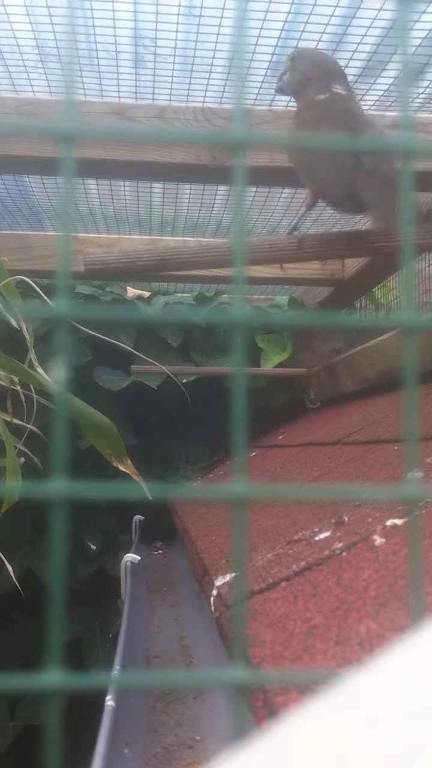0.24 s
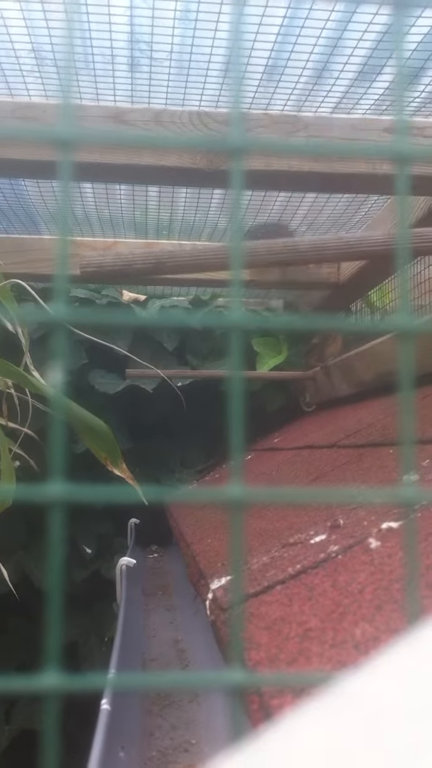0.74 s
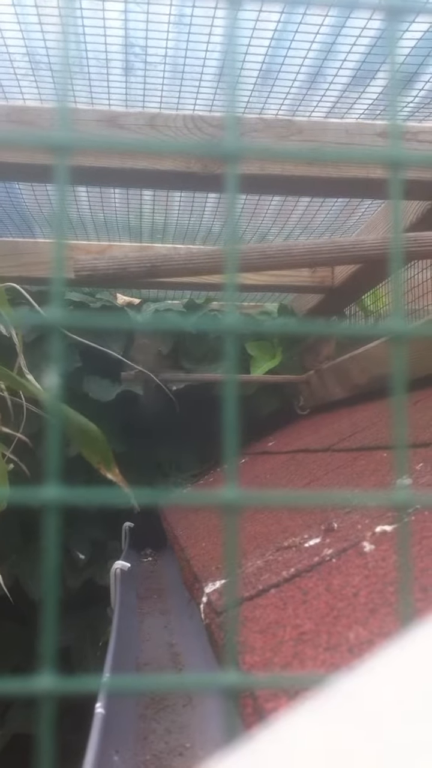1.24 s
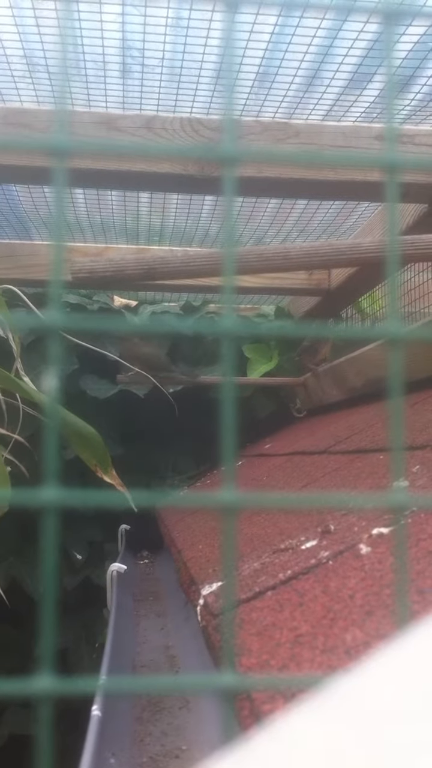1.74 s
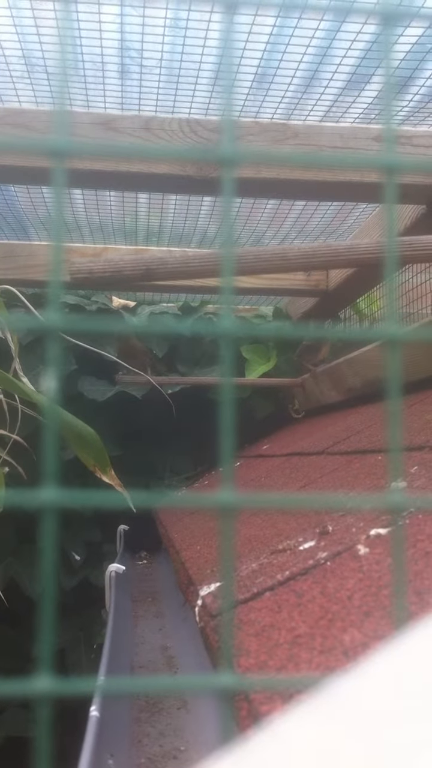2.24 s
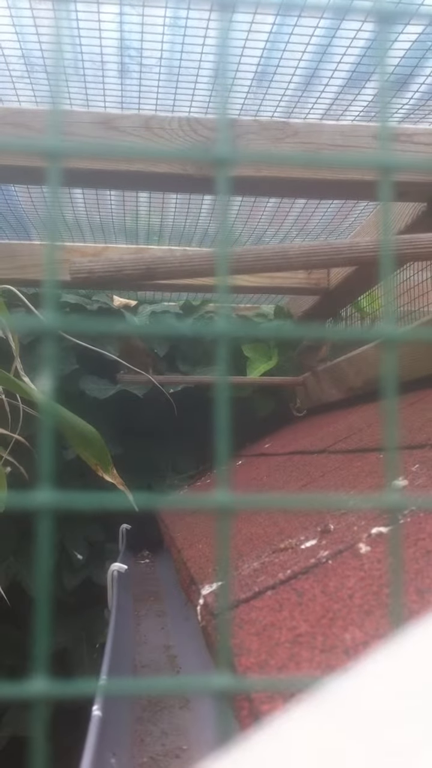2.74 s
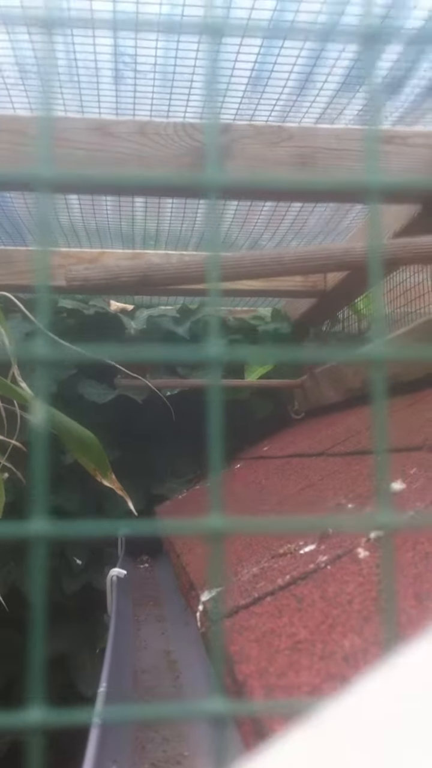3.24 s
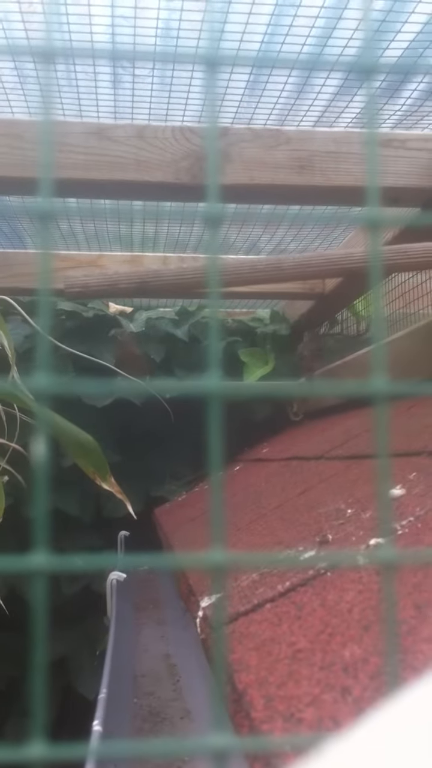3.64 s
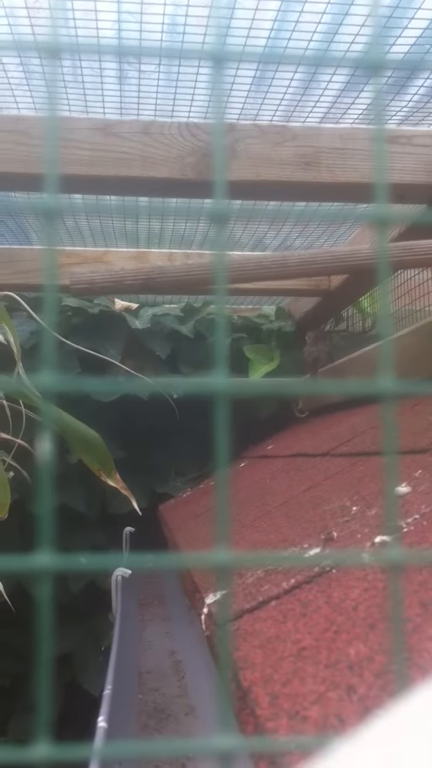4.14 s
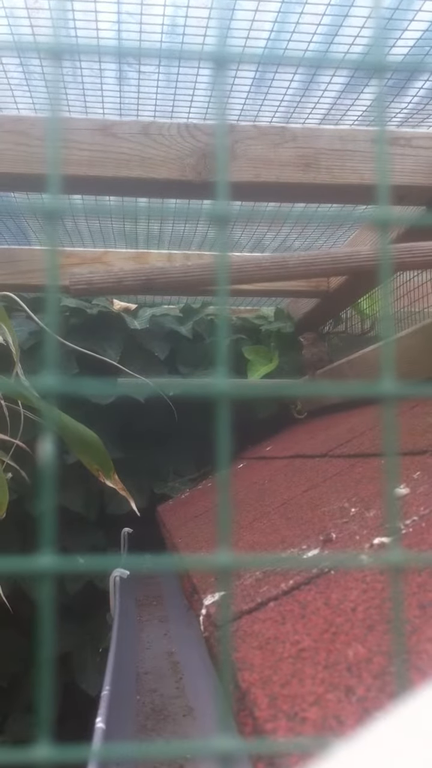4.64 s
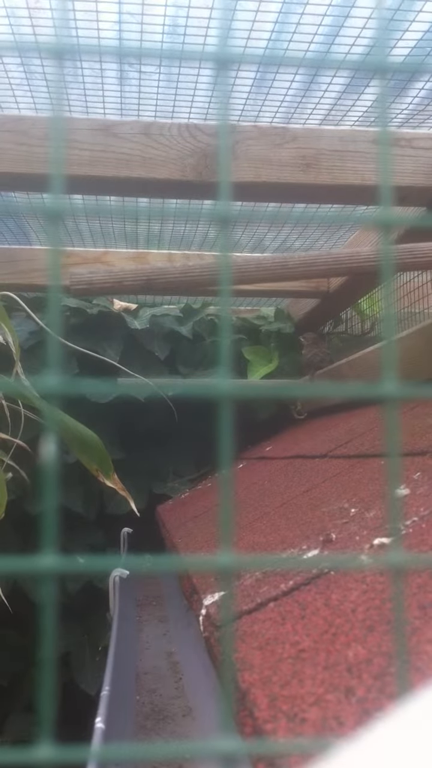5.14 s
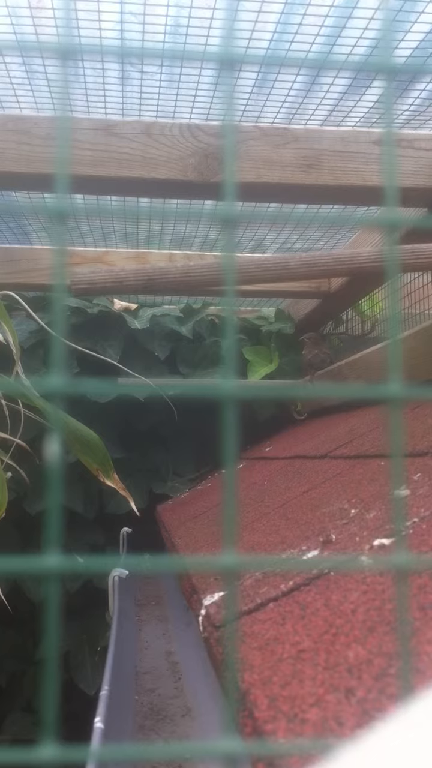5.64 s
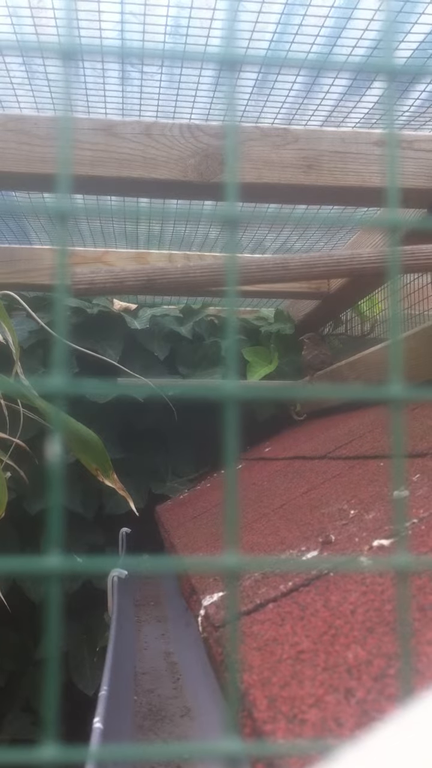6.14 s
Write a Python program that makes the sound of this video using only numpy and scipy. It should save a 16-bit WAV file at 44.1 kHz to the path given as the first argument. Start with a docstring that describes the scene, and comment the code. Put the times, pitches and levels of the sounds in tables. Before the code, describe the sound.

A young finch rasps harshly three times, flutters off its perch, then sings falling whistles and quick high chirps with soft knocks in an aviary.

```python
'''Young finch in a small aviary

It rasps three times, flutters off its perch and sings a string of quick high chirps.
Each side of its syrinx is a whistle that holds one pitch and glides to the next; at times the two overlap.
Flurries of wing beats and knocks come between the notes: shaped noise puffs, short thuds and ticks.
Reflections and a diffuse tail smear every glide, and a faint outdoor hush of filtered noise lies underneath.'''
import sys
import numpy as np
from scipy import signal
from scipy.fft import rfft, irfft, next_fast_len
from scipy.io import wavfile
from scipy.ndimage import uniform_filter1d

SR = 44100
rng = np.random.default_rng(int(sys.argv[2]) if len(sys.argv) > 2 else 0)


def to_wav(s):
    """Save 16-bit WAV."""
    ch = np.atleast_2d(s).T  # columns
    pcm = np.round(np.clip(ch, -1, 1) * 32767)  # PCM
    wavfile.write(sys.argv[1], SR, pcm.astype(np.int16))


N = 281799  # length [samples]


def gain_of(db):
    """Decibels to amplitude."""
    return 10 ** (np.asarray(db) / 20)


def evened(x):
    """Scales to rms 1."""
    return x / np.sqrt(np.mean(x ** 2) + 1e-20)


def read(points, hz):
    """Reads a table on a log-frequency axis."""
    table_hz, value = np.transpose(points)
    return np.interp(np.log(hz + 1), np.log(table_hz + 1), value)


def add(mix, start, sound):
    """Mixes a sound in at its start time in seconds."""
    part = mix[max(round(start * SR), 0):][:len(sound)]
    part += sound[:len(part)]


def coloured(x, spectrum):
    """Causal filter with the given spectrum, so resonances ring after each pulse; rms 1."""
    size = next_fast_len(len(x))
    hz = abs(np.fft.fftfreq(size, 1 / SR))
    log_gain = np.log(gain_of(read(spectrum, hz)))
    # the Hilbert transform supplies the minimum phase
    response = np.exp(signal.hilbert(log_gain).conj())[:size // 2 + 1]
    return evened(irfft(rfft(x, size) * response, size)[:len(x)])


def waver(t, rate_hz):
    """Random motion of rms 1: sines of random phase from a tenth of the given rate up to it."""
    rates = rate_hz * np.geomspace(1 / 10, 1, num=16)
    turns = rates[:, None] * t + rng.random((len(rates), 1))
    return evened(np.sin(2 * np.pi * turns).sum(0))


def swell(t, rise_s, depth_db):
    """Level in dB below the peak: a climb over rise_s, then held."""
    return -depth_db * np.maximum(1 - t / rise_s, 0)


def note(hz, db, jitter, flutter_db, rate_hz, fade=0.002):
    """Pitch, phase and loudness of one note, with the small unsteadiness of a young voice."""
    t = np.arange(len(hz)) / SR
    pitch = hz * (1 + jitter * waver(t, rate_hz))
    phase = 2 * np.pi * np.cumsum(pitch) / SR
    to_nearest_end = np.minimum(t, t[-1] - t)
    gate = np.sin(np.pi / 2 * np.clip(to_nearest_end / fade, 0, 1)) ** 2
    return pitch, phase, gate * gain_of(db + flutter_db * waver(t, rate_hz))


# outdoor hush spectrum, relative: (frequency [Hz], level [dB])
HUSH_SPECTRUM = [(15, -63.5), (25, -34.5), (69, -32.5), (89, -12.5), (156, 0), (389, -4), (433, -7.5),
                 (482, -6.5), (2700, -19), (15500, -25.5)]
HUSH_DB = -63


def hush(drift_db=-0.46):
    """Far outdoor rumble and a thin hiss: coloured noise, drifting slightly in level."""
    level_db = HUSH_DB + drift_db * waver(np.arange(N) / SR, 5)
    return gain_of(level_db) * coloured(rng.standard_normal(N), HUSH_SPECTRUM)


# how long the enclosure's tail rings: (frequency [Hz], t60 [s])
TAIL_DECAY = [(300, 0.54), (2000, 0.3), (4500, 0.23), (8000, 0.26), (15000, 0.066)]
# near reflections, before the leaves dull them: (delay [s], gain [x direct sound])
NEAR_REFLECTIONS = [(.0023, 0.43), (.0051, 0.16), (.0087, .17)]


def aviary(x, wet_db, shade_hz):
    """Direct sound and near reflections, dulled by leaves above shade_hz, then the enclosure's diffuse tail."""
    # noise whose bands die away at their own rates
    hz, t, bins = signal.stft(rng.standard_normal(SR // 2), SR, nperseg=256)
    decay = gain_of(-60 * t / read(TAIL_DECAY, hz)[:, None])
    tail = signal.istft(bins * decay, SR, nperseg=256)[1]
    response = np.zeros(SR)
    for delay, gain in [(0.000026, 1)] + NEAR_REFLECTIONS:
        add(response, delay, np.array([gain]))
    leaves = signal.butter(2, min(shade_hz, SR / 2 - 1), fs=SR)
    response = signal.lfilter(*leaves, response)
    add(response, NEAR_REFLECTIONS[0][0], gain_of(wet_db) * tail / np.linalg.norm(tail))
    return signal.fftconvolve(x, response)[:N]


def draught(s=1.0, rise=0.032, fall=0.0071, level_db=-41, hz=124, second=0.33):
    """The wake of the passing bird buffets the microphone for a few uneven cycles."""
    out, t = np.zeros(N), np.arange(-SR // 10, SR // 10) / SR
    phase = 2 * np.pi * np.cumsum(hz * (1 + .07 * waver(t, 60))) / SR
    bulge = np.exp(-(t / np.where(t < 0, rise, fall)) ** 2 / 2)
    buffeting = evened(np.sin(phase) + second * np.sin(2 * phase))
    add(out, s + t[0], gain_of(level_db) * bulge * buffeting)
    return out


# bumps and claw ticks: (time [s], dull thud level [dB], sharp click level [dB])
BUMPS_AND_TICKS = [(0.508, -56, -61), (.672, -70, -53), (0.794, -43, -46), (2.763, -45.5, -60),
                   (3.182, -60.5, -49.5), (3.349, -32, -51), (5.648, -56, -60.5)]
# perches ringing as the bird pushes off or lands: (time [s], pitch [Hz], level [dB], t60 [s])
PERCH_RINGS = [(0.231, 437, -30, 0.063), (2.093, 546, -44, 0.11)]
# body of a dull thud, relative: (frequency [Hz], level [dB])
THUD_SPECTRUM = [(40, -32.5), (150, 2), (300, -2), (500, -15), (850, -10), (1100, -39.5), (4000, -69.5)]


def knocks(click_t60=0.046, ring_rise=0.008):
    """Dull bumps are a filtered impulse, claw ticks a decaying noise burst, a perch a short ringing sine."""
    out, t = np.zeros(N), np.arange(SR // 5) / SR
    thud = coloured(signal.unit_impulse(len(t)), THUD_SPECTRUM)
    for s, thud_db, click_db in BUMPS_AND_TICKS:
        add(out, s, gain_of(thud_db) * thud / abs(thud).max())
        scratch = coloured(rng.standard_normal(len(t)), FEATHER_SPECTRUM)
        add(out, s, scratch * gain_of(click_db - 60 * t / click_t60))
    for s, hz, db, t60 in PERCH_RINGS:
        ring = gain_of(db - 60 * t / t60) * (1 - np.exp(-t / ring_rise))
        add(out, s, ring * np.sin(2 * np.pi * hz * t))
    return out


# flurries of wing beats: (start [s], beat count, air push level [dB], feather rustle level [dB])
WING_FLURRIES = [(0.651, 2, -58, -66.5), (0.8, 2, -47.5, -52), (1.046, 3, -47.5, -63),
                 (1.222, 2, -54, -71.5), (4.415, 6, -56, -64.5), (4.747, 3, -58.5, -67.5)]
# puff of pushed air, relative: (frequency [Hz], level [dB])
PUSH_SPECTRUM = [(40, -52), (110, -1.5), (220, 4), (550, -5), (1000, -18), (8000, -45)]
# scraping feathers, shared by the claw ticks, relative: (frequency [Hz], level [dB])
FEATHER_SPECTRUM = [(200, -16.5), (900, 2.5), (2500, 4), (5500, 4), (8500, -1.5), (15500, -20.5)]
BEAT_PERIOD_S, BEAT_SPREAD_DB = 0.044, 0.8


def wings(push_time=0.0066, rustle_time=0.016, grain_db=5.5):
    """Each downstroke pushes a puff of air while the feathers scrape over each other."""
    t = np.arange(-SR // 10, SR // 10) / SR
    push, rustle = np.zeros((2, N))
    for start, count, push_db, rustle_db in WING_FLURRIES:
        efforts_db = BEAT_SPREAD_DB * rng.standard_normal(round(count))
        for k, effort_db in enumerate(efforts_db):
            s = start + k * BEAT_PERIOD_S + t[0]
            add(push, s, gain_of(push_db + effort_db) * np.exp(-(t / push_time) ** 2 / 2))
            add(rustle, s, gain_of(rustle_db + effort_db) * np.exp(-(t / rustle_time) ** 2 / 2))
    # quick random level changes make the rustle grainy
    roughness = evened(uniform_filter1d(rng.standard_normal(N), size=60))
    grain = evened(gain_of(grain_db * roughness))
    puffs = push * coloured(rng.standard_normal(N), PUSH_SPECTRUM)
    return puffs + rustle * grain * coloured(rng.standard_normal(N), FEATHER_SPECTRUM)


# soft peeps, single or in a trill: (start [s], count, pitch [Hz], level [dB])
SOFT_PEEPS = [(.886, 1, 2603, -49), (.89, 1, 3280, -54), (1.197, 1, 3270, -60.5), (4.212, 1, 3690, -53),
              (5.627, 5, 3670, -55), (6.125, 1, 3890, -73)]
PEEP_PERIOD_S, PEEP_LENGTH_S = .047, 0.033


def peeps():
    """Short rounded pips at an even pace: a sine under an arched envelope."""
    out, t = np.zeros(N), np.arange(0, PEEP_LENGTH_S, 1 / SR)
    arch = np.sin(np.pi * t / PEEP_LENGTH_S) ** 2
    for s, count, hz, db in SOFT_PEEPS:
        for k in range(round(count)):
            _, phase, loud = note(np.full(len(arch), hz), db, jitter=.006, flutter_db=.8, rate_hz=220)
            add(out, s + k * PEEP_PERIOD_S, np.sqrt(2) * arch * loud * np.sin(phase))
    return out


# nasal rising notes: (start [s], length [s], first pitch [Hz], last pitch [Hz], peak level before the
# common trim [dB], swell time [s], swell depth [dB], hoarseness [0-1], overtone slope [dB per octave])
NASAL_NOTES = [(0.795, .11, 1690, 2668, -46, 0.091, 16, 0.77, 6.5),
               (2.365, 0.014, 1852, 2210, -48.5, .006, 8, 0.73, 4),
               (2.639, .107, 2070, 2422, -40, 0.05, 9, 0.22, 5.5),
               (3.679, .335, 1031, 2096, -44, 0.38, 4.5, 0, -2.5)]
# throat resonance over a nasal note, relative: (frequency [Hz], level [dB])
NASAL_THROAT = [(1000, -18), (2300, 8), (4500, 2), (15000, -21.5)]
# partials 1, 2, 3, .. before slope and throat, relative: (level [dB])
NASAL_PARTIALS = [-6, -1.5, -9, -14, -14.5, -12]
WHINE_LULL = .045  # the climb slackens halfway


def whines(level_db=-1, scatter=0.58, scatter_hz=900, steady_jitter=0.005, hoarse_jitter=0.023):
    """A buzzier membrane gives overtones that climb through the throat; uneven cycles smear the upper ones."""
    out, k = np.zeros(N), np.arange(len(NASAL_PARTIALS))[:, None] + 1
    for s, length, first_hz, last_hz, db, rise, depth_db, hoarse, slope_db in NASAL_NOTES:
        t = np.arange(0, length, 1 / SR)
        climb = t / length + WHINE_LULL * np.sin(2 * np.pi * t / length)
        pitch, phase, loud = note(first_hz * (last_hz / first_hz) ** climb, db + swell(t, rise, depth_db),
                                  jitter=steady_jitter + hoarse_jitter * hoarse, flutter_db=1.0, rate_hz=340)
        phase = phase + scatter * hoarse * waver(t, scatter_hz)
        throat_db = read(NASAL_THROAT, k * pitch)
        heights = gain_of(np.c_[NASAL_PARTIALS] + slope_db * np.log2(k) + throat_db)
        buzz = (heights * np.sin(k * phase)).sum(0) / np.linalg.norm(heights, axis=0)
        add(out, s, np.sqrt(2) * loud * buzz)
    return gain_of(level_db) * out


# rasps: (start [s], length [s], top pitch [Hz], upper voice's lead [Hz], upper voice's strength [0-1],
# level [dB], swell [dB], beak resonance [dB])
RASP_NOTES = [(0.03, 0.097, 1548, 382, 0.45, -35.5, 15, -2),
              (0.162, 0.069, 1439, 360.3, 0.39, -19.5, 15.5, 16.5),
              (0.196, .132, 1451, 383.7, 0.53, -42, 9, 1.5)]
# throat behind a rasp, relative: (frequency [Hz], level [dB])
RASP_THROAT_SPECTRUM = [(60, -79.5), (1100, -22), (1600, -20), (2400, -10), (4000, -3), (6000, 4),
                        (7200, 2.5), (10000, 1), (15500, -21)]


def rasps(arch=.37, air=0.19, beak_hz=3200, beak_width_hz=650):
    """Two arching voices gate one airstream, so their sum tones and a hiss fill the throat."""
    out, grid_hz = np.zeros(N), np.geomspace(50, SR / 2, num=120)
    for s, length, hz, lead_hz, strength, db, swell_db, beak_db in RASP_NOTES:
        t = np.arange(0, length, 1 / SR)
        u = 2 * t / length - 1  # -1 at the start, 0 mid-note, 1 at the end
        bend = (1 - arch * u ** 2) * (1 + .006 * waver(t, 700))
        low, high = (2 * np.pi * np.cumsum(f * bend) / SR for f in (hz, hz + lead_hz))
        slip = .2 * waver(t, 1300)  # uneven cycles break up the higher partials
        flow = np.exp(1.8 * (np.cos(low + slip) + strength * np.cos(high + slip)))
        flow += air * np.sqrt(flow * flow.mean()) * rng.standard_normal(SR)[:len(t)]
        beak = beak_db / (1 + ((grid_hz - beak_hz) / beak_width_hz) ** 2)
        throat = read(RASP_THROAT_SPECTRUM, grid_hz) + beak
        envelope = gain_of(db - swell_db * abs(u) ** 1.1) * signal.windows.tukey(len(t), .1)
        add(out, s, envelope * coloured(flow, np.c_[grid_hz, throat]))
    return out


# a slur starts sharp, slides from its top pitch onto a low held pitch, and weakens on the way down
SLUR_TOP_HZ, SLUR_LOW_HZ, SLUR_LANDING_SHARE = 5690, 3886, 0.96
SLUR_OVERSHOOT_HZ, SLUR_ATTACK_S, SLUR_ATTACK_DB = 645, .011, 14.5
# depth, then place and widths as shares of the length
SLUR_DIP_DB, SLUR_DIP_SHARE, SLUR_DIP_IN, SLUR_DIP_OUT = 21, 0.6, 0.33, 0.24


def slur(s, length, open_db, close_db, octave_db):
    """Pitch and level of a long falling whistle."""
    t = np.arange(0, length, 1 / SR)
    u, onset = t / length, np.exp(-t / SLUR_ATTACK_S)
    height = np.cos(np.pi / 2 * np.minimum(u / SLUR_LANDING_SHARE, 1)) ** 2
    hz = SLUR_LOW_HZ + (SLUR_TOP_HZ - SLUR_LOW_HZ) * height + SLUR_OVERSHOOT_HZ * onset
    dip_width = np.where(u < SLUR_DIP_SHARE, SLUR_DIP_IN, SLUR_DIP_OUT)
    dip = np.exp(-((u - SLUR_DIP_SHARE) / dip_width) ** 2)
    db = open_db + (close_db - open_db) * u - SLUR_DIP_DB * dip - SLUR_ATTACK_DB * onset
    return s, hz, db, octave_db


FADE_DB_PER_S = 165  # every chirp sinks at this rate once its swell is over
WARBLE_HZ, WARBLE_SETTLE_S = 13, .05  # a chirp that starts off pitch swings about it and settles
PLUNGE_SHARE, PLUNGE_S = 0.29, 0.005  # a chirp cut off while falling drops further by this share of its leap


def chirp(s, length, first_hz, second_hz, hold, glide, off_hz, db, rise, depth_db, octave_db):
    """Pitch and level of a chirp that breaks away from one pitch and eases into the next."""
    t, leap_hz = np.arange(0, length, 1 / SR), second_hz - first_hz
    hz = first_hz + leap_hz * np.sin(np.pi / 2 * np.clip((t - hold) / glide, 0, 1))
    warble = off_hz * np.exp(-t / WARBLE_SETTLE_S) * np.cos(2 * np.pi * WARBLE_HZ * t)
    cut_short = hold + glide > length
    plunge = PLUNGE_SHARE * min(leap_hz, 0) * cut_short * np.exp((t - length) / PLUNGE_S)
    level_db = db + swell(t, rise, depth_db) - FADE_DB_PER_S * np.maximum(t - rise, 0)
    return s, hz + warble + plunge, level_db, octave_db


# long falling whistles of one shape, levels before attack and dip:
# (start [s], length [s], opening level [dB], closing level [dB], octave overtone level [dB])
FALLING_SLURS = [(1.644, .268, -38.5, -34.5, -54), (2.03, .254, -22.5, -31, -51)]
# chirps that hold a pitch, then glide to another; they overlap where both sides of the syrinx sing:
# (start [s], length [s], first pitch [Hz], second pitch [Hz], hold [s], glide [s], starts off pitch by [Hz],
# peak level [dB], swell time [s], swell depth [dB], octave overtone level [dB])
GLIDING_CHIRPS = [ (2.382, 0.17, 7650, 5196, 0.067, 0.13, 317, -29, 0.13, 12.5, -48),
                  (2.74, 0.068, 3370, 3445, 0.0045, 0.023, -7, -37, 0.043, 22, -75),
                  (2.853, 0.071, 2740, 2890, 0.0088, .09, 2, -39.5, 0.03, 21.5, -55.5),
                  (2.898, .125, 4042, 3939, 0.028, 0.03, -130, -29.5, 0.075, 20.5, -66),
                  (3.098, 0.11, 7430, 7000, 0.057, 0.062, 218.5, -35, 0.09, 18.5, -53.5),
                  (3.249, 0.0885, 4790, 4944, .015, 0.031, -3, -27.5, 0.054, 23.5, -65),
                  (3.332, .09, 4914, 4540, 0.0015, .045, 0.5, -20, 0.02, 11, -57),
                  (3.469, 0.051, 6200, 6500, 0.0087, .03, -3, -37, 0.017, 15, -78),
                  (3.47, .088, 7540, 4220, 0.025, 0.032, -480, -32, 0.031, 12.5, -49.5),
                  (3.553, 0.051, 4310, 4266, 0.0074, 0.021, 10, -28, 0.0075, 16, -62),
                  (4.069, 0.087, 2880, 2765, .05, 0.032, -2, -33.5, 0.084, 24, -75),
                  (4.084, .092, 3860, 4100, 0.0054, 0.078, -2, -52.5, 0.095, 11.5, -71),
                  (4.225, 0.06, 2908, 3943, 0.045, 0.012, 4, -35, 0.042, 18, -62.5),
                  (4.275, 0.059, 3868, 3765, 0.01, 0.0564, -5, -30, 0.021, 32, -71),
                  (4.351, 0.07, 3770, 5240, 0.0087, 0.073, 3, -26.5, 0.054, 10, -66),
                  (4.345, 0.093, 4360, 6000, 0.017, 0.09, 2, -37.5, 0.045, 11, -59.5),
                  (5.473, .14, 3690, 3953, .003, 0.088, 2, -57.5, 0.11, 10, -83)]


def whistles(third_db=-40, follow=0.082, bright_hz=4000):
    """Pure tones and overtones. The throat tunes in and out of the fundamental, so the overtones swell less."""
    pure, overtones = np.zeros((2, N))
    song = [slur(*row) for row in FALLING_SLURS] + [chirp(*row) for row in GLIDING_CHIRPS]
    for s, hz, db, octave_db in song:
        pitch, phase, loud = note(hz, db, jitter=.003, flutter_db=.8, rate_hz=220)
        source = evened(loud) ** follow * signal.windows.tukey(len(loud), .1)
        # the third partial grows with the note's loudness and pitch
        third = gain_of(third_db) * np.sqrt(loud.mean()) * np.minimum(pitch / bright_hz, 1) ** 2
        heights = [gain_of(octave_db), third]
        stack = sum(height * np.sin(k * phase) * (k * pitch < SR / 2) for k, height in enumerate(heights, 2))
        add(pure, s, np.sqrt(2) * loud * np.sin(phase))
        add(overtones, s, np.sqrt(2) * source * stack)
    return pure, overtones


def scene():
    """Overtones beam away from the beak and arrive mostly by way of the walls; rasps and knocks are near and dry."""
    pure, overtones = whistles()
    song = aviary(pure, wet_db=-2.0, shade_hz=14870) + aviary(whines(), wet_db=-3.5, shade_hz=14000)
    shimmer = aviary(overtones, wet_db=-3.0, shade_hz=7923)
    flutter = aviary(wings() + peeps(), wet_db=-4.5, shade_hz=14870)
    near = aviary(rasps() + knocks(), wet_db=-13, shade_hz=15000)
    return (song + shimmer + flutter + near + draught() + hush())[None]


EDGE_HZ = 15800


def record(dry):
    """The recorder's band limit: a steep low-pass at EDGE_HZ."""
    low_pass = signal.firwin(511, EDGE_HZ, window=("kaiser", 9), fs=SR)
    return signal.oaconvolve(dry, low_pass[None], "same")


dry = scene()
out = record(dry)
to_wav(out)
```